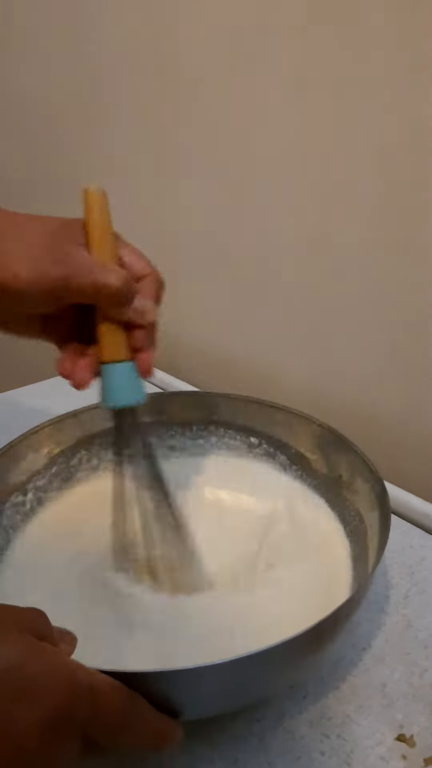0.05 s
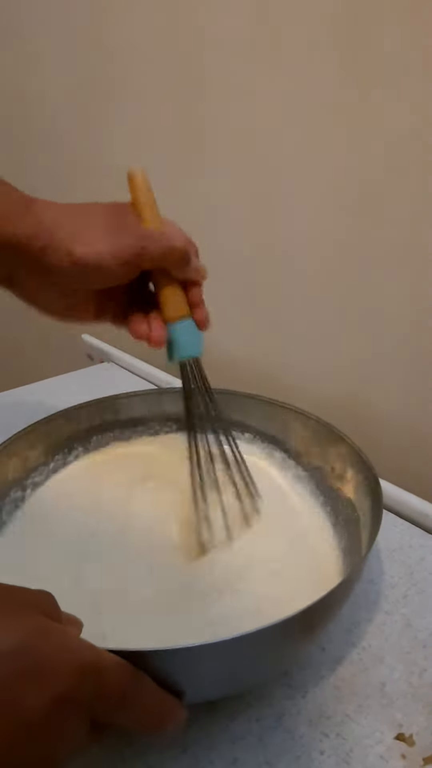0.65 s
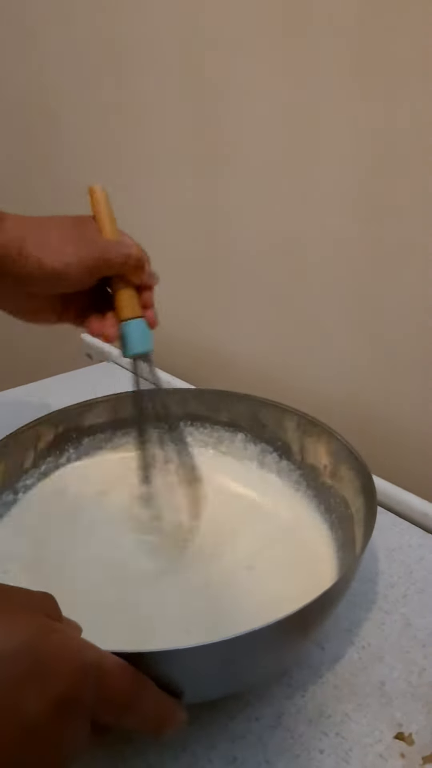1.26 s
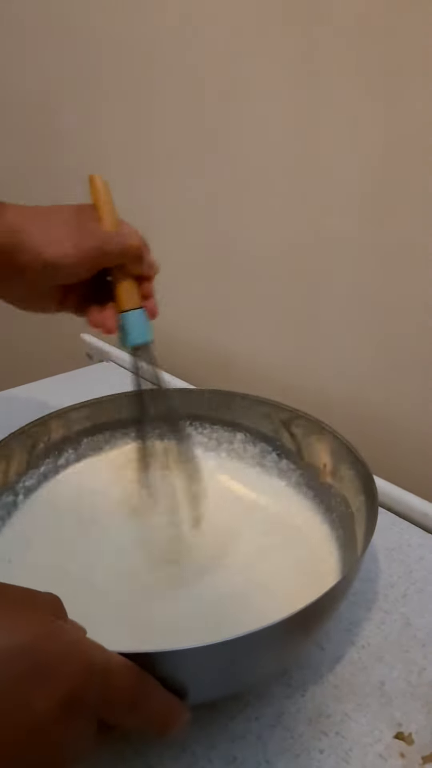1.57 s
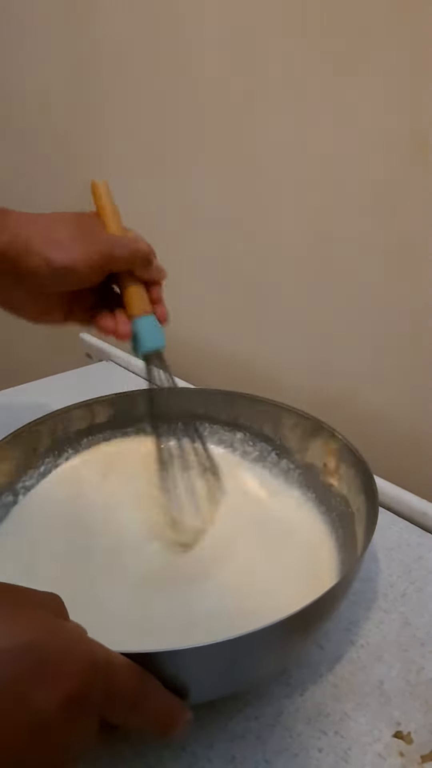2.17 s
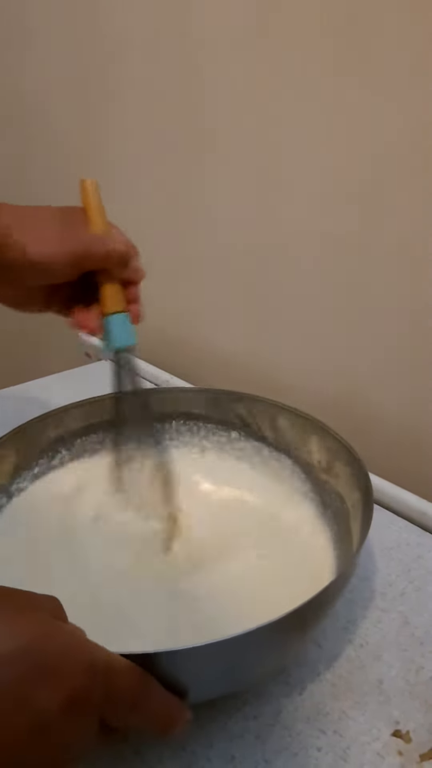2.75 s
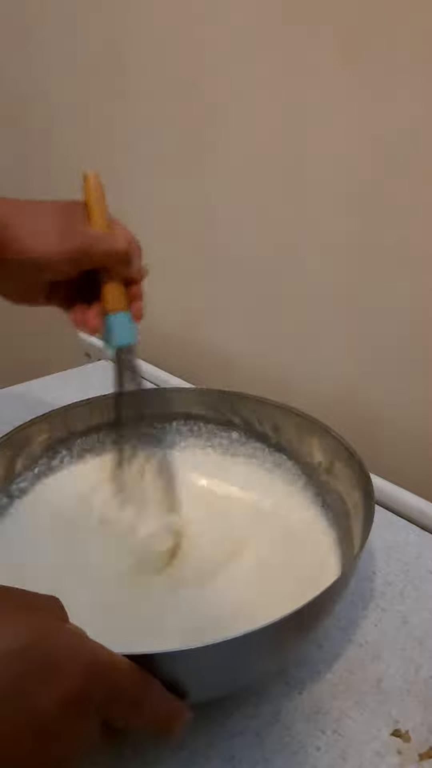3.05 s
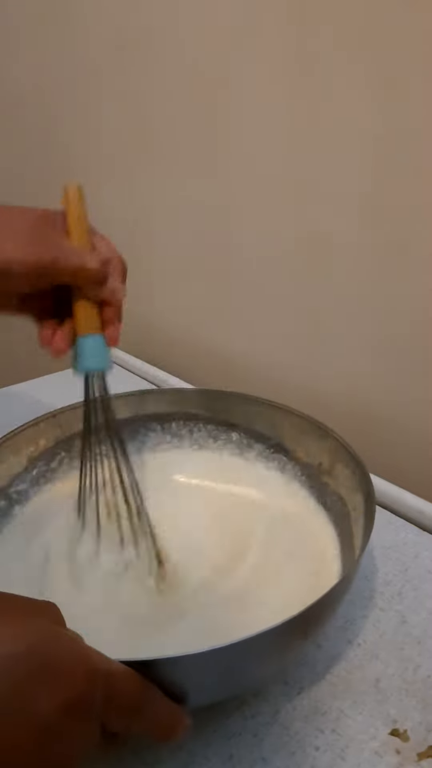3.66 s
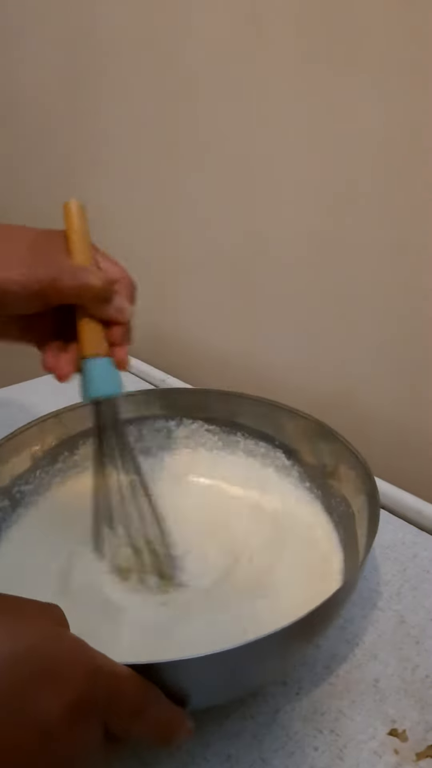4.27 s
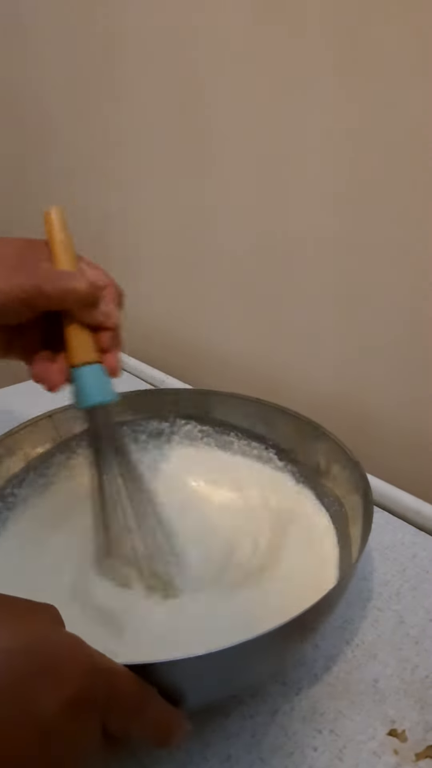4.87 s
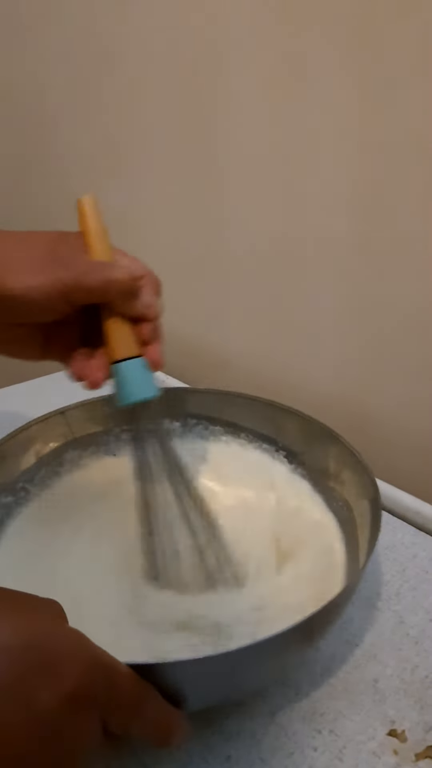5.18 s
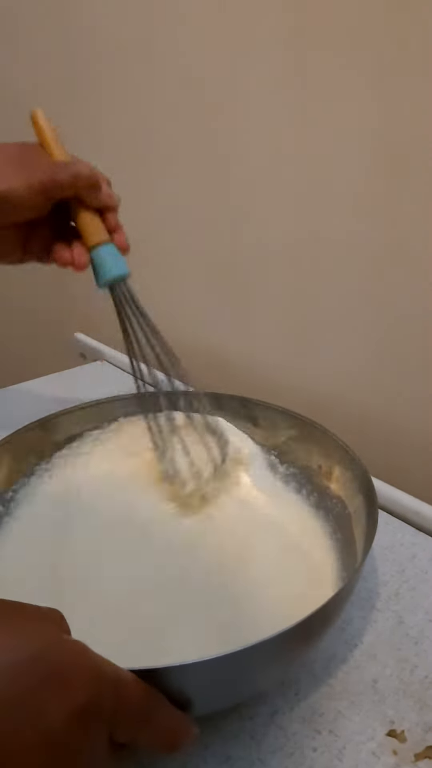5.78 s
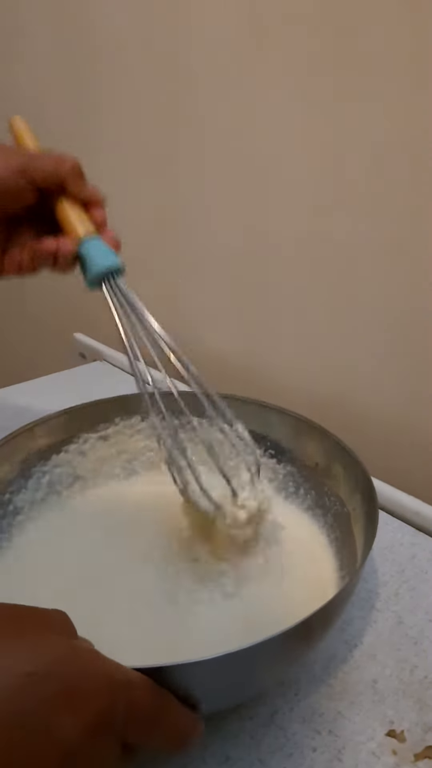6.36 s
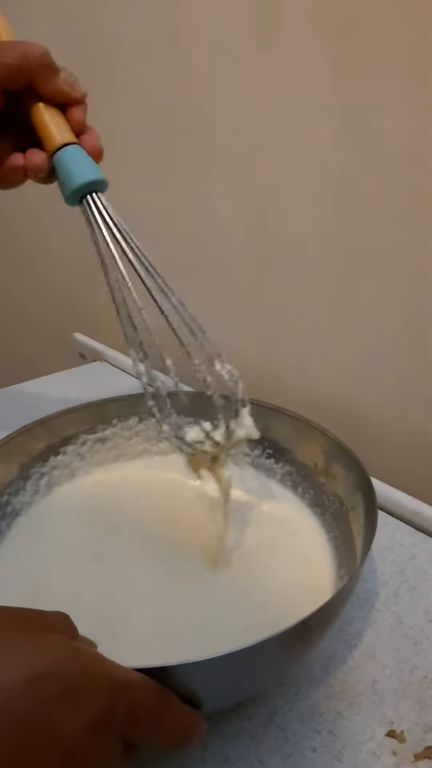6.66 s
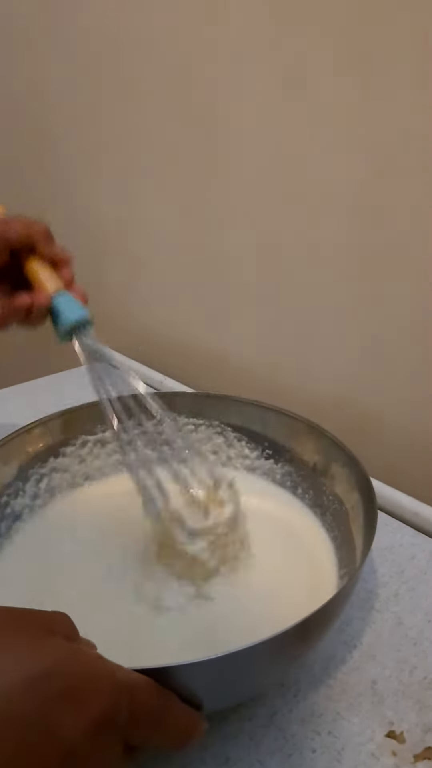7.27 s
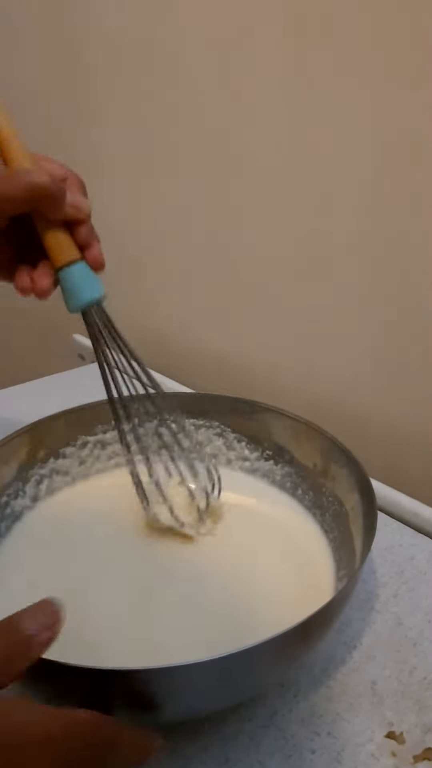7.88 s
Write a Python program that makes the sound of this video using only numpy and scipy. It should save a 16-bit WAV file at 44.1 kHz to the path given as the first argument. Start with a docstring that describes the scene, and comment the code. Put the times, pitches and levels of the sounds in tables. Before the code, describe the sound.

From the start, a wire whisk beats wet batter in a steel bowl in quick, uneven strokes. The wires drag and knock on the metal, which booms dully, while the batter squelches, crackles with froth and lets out small pops. A sharp clack comes at about 0.4 seconds. Around 2.5 seconds the wires chatter roughly against the side and the batter gurgles. The whisking carries on, with firmer knocks near 4.5 seconds and the hardest knock at about 5.5 seconds.

From about 6 seconds it turns much quieter as the whisk is lifted and dipped, with light wire ticks and spatters. One last big slosh and gulp comes near 7 seconds, followed by a few small plinks just before 8 seconds. The sound is close, with a short echo from the bowl and the small, hard kitchen over a very faint steady room rush.

```python
"""A wire whisk beats wet batter in a steel bowl on a kitchen worktop. From the start the wires drag and
knock on the bowl, which booms dully, while the batter squelches and its air pockets pop. Near 2.5 s the
wires chatter on the wall and the batter gurgles; the hardest knock comes near 5.5 s. Then the whisk is
lifted and dipped twice, with ticks, small plinks and a last big slosh near 7 s. All along, the bowl wall
and the small hard kitchen throw the sound back to a phone close by."""
import sys
import numpy as np
from scipy import signal
from scipy.fft import rfft, irfft
from scipy.io import wavfile
from scipy.ndimage import uniform_filter1d

SR = 44100
rng = np.random.default_rng(int(sys.argv[2]) if len(sys.argv) > 2 else 0)


def store_wav(level_fs):
    """Save 16-bit WAV to argv[1]."""
    pcm = np.round(np.clip(np.atleast_2d(level_fs), -1, 1) * 32767)
    wavfile.write(sys.argv[1], SR, pcm.T.astype(np.int16))


N = 358533
TIME = np.arange(N) / SR

# pushes of the whisk through the batter and along the steel, two or three to a turn of the wrist:
# (time [s], length [s], boom level [dB], scrape level [dB], squelch level [dB], froth level [dB])
WHISK_PUSHES = [ (0.0, 0.077, -52, -73, -64, -64), (0.072, 0.039, -39, -49.5, -50.5, -60.5),
                (0.188, 0.035, -36.5, -44.5, -49.5, -56), (0.391, 0.054, -30.5, -41.5, -49, -59),
                (0.432, 0.056, -34.5, -49.5, -50.5, -54.5), (0.552, 0.068, -39.5, -48.5, -51, -59.5),
                (0.775, 0.077, -40, -53.5, -50, -60), (0.948, 0.024, -33, -45, -53, -57),
                (1.108, 0.093, -46.5, -56.5, -49, -60), (1.228, 0.065, -40.5, -50.5, -54, -59.5),
                (1.399, 0.048, -41, -51.5, -50.5, -60), (1.493, 0.14, -43, -53.5, -61, -59.5),
                (1.705, 0.07, -39, -47.5, -51.5, -59.5), (1.826, 0.06, -48, -69, -61.5, -67.5),
                (1.998, 0.12, -41.5, -55, -61, -70.5), (2.12, 0.05, -49.5, -55.5, -60.5, -62),
                (2.277, 0.19, -40, -51, -60, -67.5), (2.384, 0.15, -35.5, -40.5, -53, -61.5),
                (2.618, 0.1, -35, -45.5, -49, -59), (2.818, 0.04, -39.5, -65, -63, -75),
                (2.92, 0.075, -40.5, -52.5, -56, -63), (3.03, 0.083, -42.5, -53, -47, -52.5),
                (3.154, 0.19, -47, -81, -71, -80), (3.254, 0.11, -44.5, -55, -57.5, -64),
                (3.406, 0.097, -43, -59, -58.5, -63.5), (3.586, 0.2, -45, -60.5, -57, -66),
                (3.787, 0.031, -37, -47, -53.5, -79), (3.884, 0.056, -41, -55.5, -53, -58),
                (4, 0.12, -38, -48, -52, -57), (4.211, 0.072, -41, -56.5, -51.5, -62.5),
                (4.341, .04, -41, -49, -50.5, -57), (4.406, 0.019, -29, -42.5, -49.5, -56.5),
                (4.534, 0.028, -27, -36.5, -45, -55), (4.648, 0.033, -38, -45, -46, -57),
                (4.883, 0.13, -51.5, -62, -63, -73), (5.023, 0.11, -38.5, -49, -50.5, -64),
                (5.201, 0.14, -32, -46.5, -53.5, -56.5), (5.34, 0.047, -56, -47.5, -50, -54),
                (5.526, 0.025, -25, -33.5, -36, -44), (5.626, 0.013, -28.5, -37, -45, -54),
                (6.08, 0.062, -56, -82, -71.5, -70), (6.192, 0.039, -50, -72, -92, -77),
                (6.341, 0.044, -83, -80, -71.5, -87), (6.397, 0.027, -47.5, -59.5, -82, -89),
                (7.047, 0.066, -38, -34.5, -47, -53), (7.094, 0.055, -25, -37, -48, -67),
                (7.267, .23, -27.5, -47, -55.5, -72), (7.938, 0.012, -62, -74, -59.5, -67.5),
                (8.022, 0.076, -46, -63, -92, -79)]
# tone of squelching batter: (frequency [Hz], level [dB])
SQUELCH_TONE = [(600, -1), (1100, 0.5), (1800, 1.5), (2600, 1.5), (3600, 2), (5200, 2.5), (6500, -4.5),
                (9000, -10.5), (16000, -23)]
# tone of crackling froth: (frequency [Hz], level [dB])
FROTH_TONE = [(3500, -11.5), (6500, -1), (8000, 2.5), (9700, -4.5), (11500, 3.5), (14000, -0.5),
              (16000, -6.5)]


def undb(db):
    """Turn decibels into a factor to multiply by."""
    return 10 ** (np.asarray(db) / 20)


def unit(x):
    """Scale a sound to an average strength (rms) of 1."""
    return x / np.sqrt(np.mean(x ** 2))


def at(points, hz):
    """Read a curve of (frequency, value) points, with octaves evenly spaced."""
    freqs, values = np.transpose(points)
    return np.interp(np.log(np.maximum(hz, 1)), np.log(freqs), values)


def colour(x, points, share=1):
    """Shape the tone of a sound with a (frequency, dB) curve; share scales the decibels."""
    size = 4096
    gains = undb(share * at(points, np.fft.rfftfreq(size, 1 / SR)))
    cepstrum = irfft(np.log(gains))
    # folding this onto its first half makes the filter ring only after a hit, never before
    cepstrum[1:size // 2] *= 2
    cepstrum[size // 2 + 1:] = 0
    return signal.oaconvolve(x, irfft(np.exp(rfft(cepstrum))))[:len(x)]


def fade(t, fade_s):
    """Die away smoothly, dropping 60 dB in the fade time."""
    return np.exp(-np.log(1000) * t / fade_s)


def add(out, start, sound):
    """Mix a sound in at a start time in seconds."""
    i = int(start * SR)
    out[..., i:i + sound.shape[-1]] += sound[..., :N - i]


def even(x, seconds):
    """Take out slow swells and keep the fine grain, at a strength of about 1."""
    size = int(seconds * SR)
    power = uniform_filter1d(uniform_filter1d(x ** 2, size), size)
    return x / np.sqrt(np.abs(power) + 1e-12)


def wide(make, side_db):
    """Sounds scattered over the bowl reach left and right partly alike, partly not."""
    middle, side = make(), undb(side_db) * make()
    return np.array([middle + side, middle - side]) / np.sqrt(1 + undb(side_db) ** 2 / 2)


def clicks(count, per_s, spread_db):
    """Tiny hits of very unequal size at random moments."""
    out = np.zeros(count)
    where = np.flatnonzero(rng.random(count) < per_s / SR)
    chance = rng.uniform(-1, 1, count)[where]
    out[where] = np.sign(chance) * undb(-spread_db * np.log(np.abs(chance) + .02))
    return out


def swells(rows, rise_s, sag_db_per_s, fall_db_per_s):
    """Loudness over time from (time, length, dB) rows: each rises, sags while it lasts, then dies away."""
    power, t = np.full(N, 1e-14), TIME[:SR]
    for start, length, db in rows:
        held = np.minimum(t, length)
        shape = np.minimum(t / rise_s, 1) * undb(-sag_db_per_s * held - fall_db_per_s * (t - held))
        add(power, start, (undb(db) * shape) ** 2)
    return np.sqrt(power)


def room_tone(db=-75, side_db=-5):
    """The faint steady rush of the kitchen."""
    # tone of the rush: (frequency [Hz], level [dB])
    rush_tone = [(30, -14.5), (110, -12), (220, -13.5), (400, -14), (620, -5), (900, -19), (1500, -28),
                 (3000, -30), (4800, -28), (7000, -32), (16000, -32.5)]
    middle, side = (unit(colour(rng.standard_normal(N), rush_tone)) for _ in range(2))
    return undb(db) * (middle + undb(side_db) * side * np.array([[1], [-1]]))


def kitchen(x, wall_db=-6, wall_fade_s=0.022):
    """Echoes at one microphone: a quick flutter off the bowl wall, then the wash of the room."""
    # tone of the echoes: (frequency [Hz], level [dB])
    echo_tone = [(50, -19.5), (150, -17), (300, -7), (700, -0.5), (2000, 0.5), (5000, -4.5), (12000, -1.5)]
    # how long the room rings: (frequency [Hz], fade time [s])
    room_fades = [(100, 0.83), (1000, 0.28), (4000, 0.34), (9000, 0.45), (16000, 0.64)]
    t = TIME[:SR * 3 // 4]
    hz, times, bands = signal.stft(rng.standard_normal(len(t)), SR, nperseg=256)
    tail = signal.istft(bands * fade(times, at(room_fades, hz)[:, None]), SR)[1][:len(t)]
    tail *= np.clip(t / 0.0031 - .5, 0, 1)  # the room answers a moment late
    wall = rng.standard_normal(len(t)) * fade(t, wall_fade_s) * (t > .001)
    echoes = tail / np.linalg.norm(tail) + undb(wall_db) * wall / np.linalg.norm(wall)
    return signal.fftconvolve(x, colour(echoes, echo_tone))[:N]


def bubble(hz, cycles, glide):
    """An air pocket rings: it peaks after `cycles` swings, then dies away, rising a little in pitch."""
    age = np.arange(int(10 * cycles * SR / hz) + 2) * hz / SR / cycles
    return age * np.exp(1 - age) * np.sin(2 * np.pi * cycles * age * (1 + glide * age))


def bubbles(rows, glide):
    """One ringing air pocket for each (time, level, pitch, cycles) row."""
    out = np.zeros(N)
    for start, db, hz, cycles in rows:
        add(out, start, undb(db) * bubble(hz, cycles, glide))
    return out


def pockets(per_s, low_hz, high_hz, cycles, spread_db):
    """A crowd of air pockets of all sizes, opening at random moments."""
    out = np.zeros(N)
    when, pitch, size, ring = rng.random((int(per_s * N / SR), 4)).T
    pitch_hz = low_hz * (high_hz / low_hz) ** pitch
    gains = undb(-spread_db * np.log(size + 0.026)) * pitch_hz
    for start, gain, hz, swings in zip(when * N / SR, gains, pitch_hz, cycles * (.5 + ring)):
        add(out, start, gain * bubble(hz, swings, glide=0.012))
    return unit(out)


def drips():
    """Small air pockets plink faintly as the whisk is lifted and dipped."""
    # plinks: (time [s], level [dB], pitch [Hz], rise [cycles])
    plinks = [(5.954, -59, 622, 3.8), (5.995, -65, 634, 4.6), (6.685, -58.5, 8020, 13.4),
              (7.809, -51, 6300, 2.7), (7.819, -58, 6070, 4.5), (7.835, -62.5, 5660, 9),
              (7.951, -47.5, 1028, 4.1), (7.958, -38.5, 2980, 2.8)]
    return bubbles(plinks, glide=0.00081)


def ticks(ring_db=-2):
    """Light wire touches and spatters: a tiny sharp snap with a brief ring."""
    # touches: (time [s], level [dB], ring pitch [Hz])
    touches = [(0.3027, -38.5, 5860), (2.9993, -39.5, 12000), (3.328, -41.5, 6930), (3.4034, -43.5, 4640),
               (3.694, -31, 3880), (4.1081, -26, 3770), (4.373, -41, 4970), (4.5289, -40, 3560),
               (4.664, -37, 4700), (5.8392, -48, 5100), (5.9775, -47, 10960), (6.4945, -52, 13000),
               (6.59, -47, 13700), (6.6085, -38, 8230), (6.6884, -42.5, 7640), (6.9367, -27, 5030),
               (6.941, -30.5, 5610), (7.9458, -40, 5000)]
    out, t = np.zeros(N), TIME[:SR // 50]
    for start, db, hz in touches:
        snap = colour(rng.standard_normal(len(t)) * fade(t, 0.0097), FROTH_TONE)
        ring = np.sin(2 * np.pi * hz * t) * fade(t, 0.013)
        add(out, start, undb(db) * (snap / np.abs(snap).max() + undb(ring_db) * ring) / 2)
    return out


def pops(lean_share=0.86, ring_db=-13):
    """Air pockets snap open, each at its own place in the bowl; the hollow rings on, a little lower."""
    # bursting pockets: (time [s], level [dB], pitch [Hz], rise [cycles], lean to the left [dB])
    bursts = [(0.0837, -36.5, 4630, 0.8, -7), (0.6227, -46, 1090, 1.5, 2), (0.6458, -35, 3900, 0.75, -1),
              (0.6556, -45.5, 1440, 1.2, 7), (0.8977, -38.5, 1345, 0.66, 5), (0.9328, -31.5, 4200, 1.3, -2),
              (0.985, -35, 3090, 1, -5), (1.141, -37.5, 3620, 1.5, -6), (1.1612, -29.5, 5740, 1.2, -4),
              (1.225, -42, 2100, 1, 2), (1.5553, -46, 5440, 1.3, -5), (1.6122, -36, 3440, 1.4, -1),
              (1.699, -40, 5600, 1.2, -9), (2.143, -42.5, 5300, 1.1, -2), (2.6346, -49, 4470, 1.1, -17),
              (2.8333, -52.5, 4850, 1.1, -13), (2.8857, -42.5, 5100, 0.81, -4),
              (3.047, -38.5, 5200, 1.2, -9), (3.068, -44, 1130, 1.5, -3.5), (3.4226, -48.5, 2160, 1.1, 6),
              (3.893, -50, 4600, 1.4, -2), (3.916, -43.5, 1730, 1.1, 7), (4.0015, -43.5, 3800, 1.38, -6.5),
              (4.0842, -45, 1570, 1.7, -5.5), (4.1081, -40, 3530, 1.5, -9), (4.1975, -47, 1730, 1.48, -9),
              (4.241, -34.5, 3620, 2.2, -3), (4.363, -47, 1600, 1, -4), (4.799, -42, 5200, 1.9, -6),
              (5.003, -38.5, 4400, 0.59, -14), (5.027, -27.5, 5560, 0.88, -7.5),
              (5.073, -32.5, 5200, 0.74, -2), (5.3673, -44, 1146, 1.6, 10), (5.4063, -33, 1077, 1.2, -8),
              (5.7083, -41.5, 1615, 1.6, 0)]
    out = np.zeros((2, N))
    for start, db, hz, cycles, lean_db in bursts:
        gain = undb(db + lean_share * np.array([[lean_db], [-lean_db]]) / 2)
        add(out, start, gain * bubble(hz, cycles, glide=.004))
        ring = bubble(hz * .96, cycles * 3.6, glide=.003)
        add(out, start + 3 * cycles / hz, gain * undb(ring_db) * ring)
    return out


def glugs():
    """Big air pockets gulp as the batter folds over them behind the whisk."""
    # closing pockets: (time [s], level [dB], pitch [Hz], rise [cycles])
    gulps = [(0.60, -51.5, 398, 2.6), (2.28, -46, 395, 11), (2.46, -35.5, 338.3, 9.6),
             (2.54, -37.5, 369.3, 7.4), (3.79, -40.5, 254, 4.9), (5.236, -25, 174, 1.1),
             (7.068, -30.5, 403, 7.2), (7.29, -41.5, 256, 5.1), (7.439, -38.5, 302, 3)]
    return bubbles(gulps, glide=0.014)


def churn(start=2.3, end=2.766, db=-44):
    """Stirred deep, the batter folds over many large pockets at once: a round, unbroken gurgle."""
    out, count = np.zeros(N), int((end - start) * SR)
    gurgle = even(pockets(220, 239.5, 520, cycles=3, spread_db=1.5), 0.069)[:count]
    add(out, start, undb(db) * gurgle * signal.windows.tukey(count, .9))
    return out


def splats(boost_db=1):
    """A sheet of batter gives way at once: a sudden spray of wet clicks that quickly fades."""
    # batter slapping and tearing open: (time [s], level [dB], fade time [s], brightness [dB])
    slaps = [(0.2006, -47, 0.037, -25), (1.1406, -39, 0.04, 25), (1.2545, -42, 0.085, -19),
             (1.7422, -36.5, 0.058, 8), (2.7551, -39.5, 0.046, -11), (3.046, -34.5, 0.038, -2),
             (3.0687, -32.5, 0.074, -39), (4.0004, -40.5, 0.064, -10), (4.362, -37, 0.033, -20),
             (4.6664, -28, 0.028, -4.5), (4.6751, -33, 0.06, -32), (5.3374, -36, 0.039, -0.5),
             (5.368, -25.5, 0.035, -10.5), (5.4064, -31.5, 0.025, -2), (5.7048, -34.5, 0.045, 4),
             (7.0588, -29, 0.076, -14.5), (7.0941, -29, 0.073, -20)]
    out, t = np.zeros((2, N)), TIME[:SR // 4]
    for start, db, fade_s, bright_db in slaps:
        def wet_clicks():
            wet = colour(clicks(len(t), 5000, 2.5) * fade(t, fade_s), SQUELCH_TONE)
            return colour(wet, [(1200, 0.0035), (6000, bright_db)])
        spray = wide(wet_clicks, side_db=-2)
        add(out, start, undb(db + boost_db) * spray / np.abs(spray).max())
    return out


def pressure():
    """How hard the wires press on the bowl: the loudness of its boom and of its scrape over time."""
    start, length, boom_db, scrape_db, _, _ = np.transpose(WHISK_PUSHES)
    shape = dict(rise_s=.018, sag_db_per_s=34.5)
    return (swells(zip(start, length, boom_db), **shape, fall_db_per_s=198),
            swells(zip(start, length, scrape_db), **shape, fall_db_per_s=208.5))


def tearing():
    """How fast the batter is torn: the loudness of its squelch and of its froth over time."""
    # foam bursting off the wires as they leave the batter: (time [s], length [s], level [dB])
    sprays = [(0.708, 0.044, -60.5), (0.893, 0.03, -57.5), (2.565, 0.013, -53), (2.742, 0.018, -54),
              (2.879, 0.019, -59), (3.526, .04, -71), (3.684, 0.019, -47.5), (4.803, .04, -68),
              (4.926, .04, -66), (4.956, 0.1, -50.5), (5.84, 0.01, -62.5), (6.235, 0.043, -68.5),
              (6.589, 0.033, -60.5), (6.676, .03, -65.5), (6.93, 0.017, -46.5)]
    start, length, _, _, squelch_db, froth_db = np.transpose(WHISK_PUSHES)
    shape = dict(rise_s=0.014, sag_db_per_s=26, fall_db_per_s=196.5)
    return (swells(zip(start, length, squelch_db), **shape),
            swells([*zip(start, length, froth_db), *sprays], **shape))


def clumps(per_s, spread_db):
    """Quick random swells as single wires cut in and out."""
    size = int(SR / per_s)
    steps = np.repeat(rng.standard_normal(N // size + 1), size)
    return unit(undb(spread_db * uniform_filter1d(steps, size // 2)[:N]))


def batter(surface_db=-55, deep_db=-30, squelch_db=-5.5, froth_db=-3.5, foam_db=-2):
    """Wires tear separate pockets at the surface and swish smoothly deep down; froth crackles on top."""
    def torn_pockets():
        return even(colour(pockets(240, 1005, 6760, cycles=1.25, spread_db=4), SQUELCH_TONE), 0.13)

    def crackle():
        snaps = unit(clicks(N, 900, 5.2))
        foam = pockets(160, 6480, 15500, cycles=1.8, spread_db=5.5)
        return even(colour(snaps + undb(foam_db) * foam, FROTH_TONE), 0.043)

    squelch_gain, froth_gain = tearing()
    boom_db = 20 * np.log10(pressure()[0])  # a louder boom means the whisk is deeper
    depth = np.clip((boom_db - surface_db) / (deep_db - surface_db), .2, .95)
    torn = wide(torn_pockets, side_db=2)
    swish = wide(lambda: even(colour(clicks(N, 3500, 3.8), SQUELCH_TONE), .06), side_db=2.5)
    froth = wide(crackle, side_db=-2.5) * froth_gain * undb(froth_db)
    squelch = (np.sqrt(1 - depth) * torn + np.sqrt(depth) * swish) * squelch_gain * undb(squelch_db)
    return clumps(per_s=60, spread_db=4) * (squelch + froth)


def bowl(low_hz, high_hz=SR):
    """The bowl's ring after one tap, within a pitch range; neighbouring notes swing opposite ways."""
    # notes of bowl, batter and worktop ringing together: (pitch [Hz], level [dB], fade time [s])
    notes = [(48.8, -7, 0.23), (73, -4, 0.18), (90.9, -3.5, 0.29), (109.6, -0.5, 0.22), (129.8, 0.5, 0.36),
             (139.9, -1, 0.18), (164.8, -10.5, 0.55), (194.7, -6, 0.14), (261, -9.5, 0.3),
             (304.7, -14, 0.4), (339.7, -4, .3), (408.5, -6.5, 0.14), (559, -14.5, 0.15),
             (615, -14.5, 0.42), (800, -39, 0.075), (777, -10, 0.22), (900, -18, 0.26), (995.4, -20, 0.077),
             (1246, -19, 0.11), (1517, -19, .2), (1618, -21, 0.33), (2234, -11.5, 0.44), (2520, -18.5, .25),
             (2970, -6.5, .25), (3320, -21.5, .25), (3350, 0, 0.084), (4070, -13, .22)]
    t = TIME[:SR // 3]
    return sum((-1) ** k * undb(db) * fade(t, fade_s) * np.sin(2 * np.pi * hz * t)
               for k, (hz, db, fade_s) in enumerate(notes) if low_hz <= hz < high_hz)


def judder(start=2.39, end=2.79, slips_per_s=128, wobble=0.084, rough_db=2, db=-42):
    """Pressed against the wall, the wires stick and slip in a rough, nearly regular chatter."""
    # tone of the chatter: (frequency [Hz], level [dB])
    tone = [(80, -14), (140, 4), (260, 2), (370, 10.5), (460, -2), (600, -3), (800, -5.5), (1100, 4)]
    out, count = np.zeros(N), int((end - start) * SR)
    drift = unit(uniform_filter1d(rng.standard_normal(count), size=500))
    slips_so_far = np.floor(np.cumsum(slips_per_s * (1 + wobble * drift)) / SR)
    slips = np.diff(slips_so_far, prepend=0) * undb(rough_db * rng.standard_normal(count))
    ring = signal.fftconvolve(slips * signal.windows.tukey(count, .5), bowl(100, 1100))
    add(out, start, undb(db) * unit(colour(ring, tone)[:count]))
    return out


def knocks(snap_db=-1, body_db=-9, hollow_db=7, ring_db=-16, rattle_db=-15, rattle_fade_s=0.11):
    """A wire snaps against the steel, its neighbours rattle after it, and the blow rings the bowl."""
    # wire strikes: (time [s], clack level [dB], thud level [dB], fade time [s], brightness [dB])
    strikes = [(0.399, -34, -44.5, 0.012, -20), (0.4452, -26, -40.5, 0.015, -8),
               (0.9714, -38.5, -56, 0.017, 0), (1.4215, -42.5, -52, 0.017, 1),
               (2.0075, -49.5, -67, 0.018, 2), (2.397, -38, -65, 0.01, -7),
               (2.6509, -36.5, -54, 0.018, -4.5), (3.266, -43, -52, 0.012, 2),
               (4.4223, -35, -46, 0.025, -43), (4.5424, -30, -30.5, 0.015, -18),
               (4.639, -32.5, -47, 0.011, -5), (5.026, -35.5, -51, 0.013, -12), (5.0708, -52, -64, 0.01, 7),
               (5.532, -21, -27, 0.0079, -7), (5.5451, -24.5, -43, 0.021, 2), (5.678, -36, -61, 0.018, -8)]
    # tone of wire hitting steel: (frequency [Hz], level [dB])
    clack_tone = [(300, -20.5), (800, -3.5), (1200, -18.5), (2200, -8), (4200, -5.5), (5500, -8),
                  (7000, -13.5), (11000, -12), (16000, -25)]
    out, t = np.zeros((2, N)), TIME[:SR // 3]

    def burst(shape, bright_db):
        noise = colour(rng.standard_normal(len(t)) * shape, clack_tone)
        return colour(noise, [(3000, 0), (10000, bright_db)])

    # a hard blow brings out the wall's hollow notes more than rubbing does
    body = bowl(0, 700) + undb(hollow_db) * bowl(700, 1100)
    body /= np.std(body[:SR // 20])
    steel = bowl(1100)
    steel /= np.abs(steel).max()
    for start, clack_db, thud_db, fade_s, bright_db in strikes:
        touch = fade(t, fade_s) + undb(rattle_db) * fade(t, rattle_fade_s)
        clack = wide(lambda: burst(touch, bright_db), side_db=-9)
        snap = burst(fade(t, 0.009), bright_db)
        contact = clack / np.abs(clack).max() + undb(snap_db) * snap / np.abs(snap).max()
        thud = undb(thud_db + body_db) * body
        add(out, start, undb(clack_db) * (contact + undb(ring_db) * steel) + thud)
    return out


def drag(split_hz=230, slosh_db=-2, db=-1):
    """Wires stick and slip over the steel: slow pushes boom, quick slips scrape, the batter sloshes."""
    # a wire cushioned by batter rings the higher notes less: (frequency [Hz], level [dB])
    cushion = [(260, 1.5), (400, 1), (600, -1), (780, -10.5), (950, -6), (1500, -4.5)]
    # tone of sloshing batter: (frequency [Hz], level [dB])
    slosh_tone = [(160, -26), (260, -1), (370, -4.5), (520, -9), (640, -9.5), (800, -8), (1000, -17.5),
                  (1600, -31.5)]
    boom_gain, scrape_gain = pressure()
    low_ring, high_ring = bowl(0, split_hz), colour(bowl(split_hz, 1600), cushion)

    def rub(ring, per_s, spread_db, even_s):
        return even(signal.oaconvolve(clicks(N, per_s, spread_db), ring)[:N], even_s)

    boom = wide(lambda: rub(low_ring, per_s=160, spread_db=3.6, even_s=0.046), side_db=-19.5)
    scrape = wide(lambda: rub(high_ring, per_s=350, spread_db=4, even_s=0.031), side_db=-9.5)
    slosh = even(colour(pockets(130, 220, 1100, cycles=2.52, spread_db=3.5), slosh_tone), 0.014)
    wet_scrape = (scrape + undb(slosh_db) * slosh) / np.hypot(1, undb(slosh_db))
    return undb(db) * (boom * boom_gain + wet_scrape * scrape_gain)


def scene(pop_echo_db=-4, left_share=0.32):
    """Whisk, bowl and batter in the kitchen; pops on the open surface face the phone and echo less."""
    # tone balance of the phone's two microphones: (frequency [Hz], left minus right [dB])
    balance = [(60, 0), (300, 1), (780, 3.5), (1300, 3), (2400, 1), (4200, -10), (5600, -7.5), (6800, 5.5),
               (9000, 1), (11200, 4), (14500, 4)]
    whisking = drag() + judder() + churn() + knocks() + splats() + ticks() + batter() + glugs() + drips()
    left, right = (whisk + pop + kitchen(whisk + undb(pop_echo_db) * pop)
                   for whisk, pop in zip(whisking, pops()))
    heard = np.array([colour(left, balance, left_share), colour(right, balance, left_share - 1)])
    return heard + room_tone()


def record(dry):
    """The phone drops the deepest bass and cuts the highest treble."""
    bass_cut = signal.butter(4, 40, "high", fs=SR, output="sos")
    treble_cut = signal.ellip(10, .2, 80, 16000, fs=SR, output="sos")
    return signal.sosfilt(treble_cut, signal.sosfilt(bass_cut, dry))


dry = scene()
out = record(dry)
store_wav(out)
```